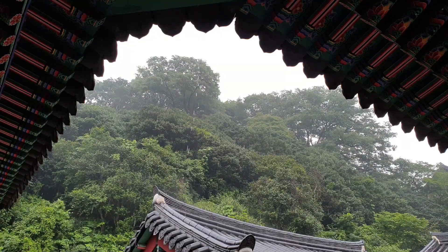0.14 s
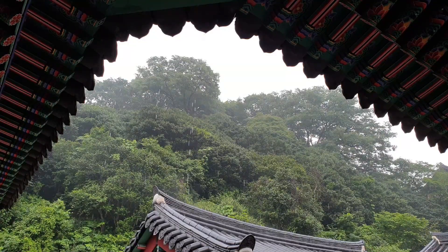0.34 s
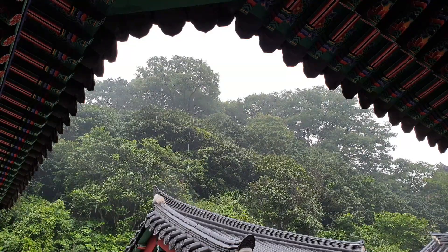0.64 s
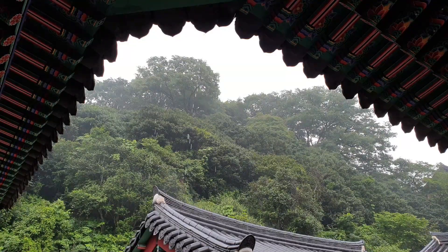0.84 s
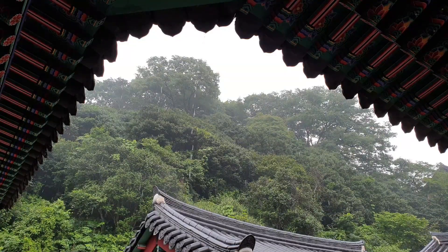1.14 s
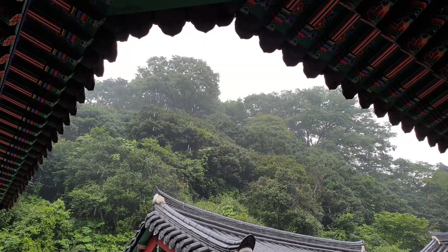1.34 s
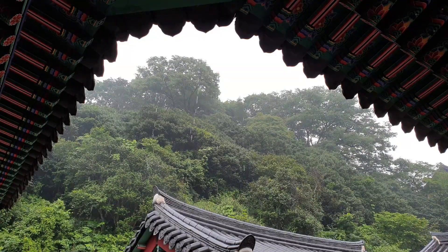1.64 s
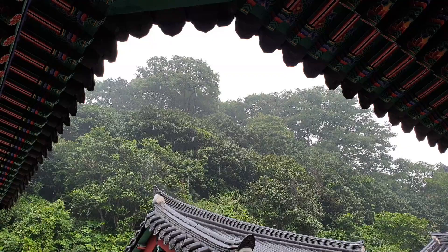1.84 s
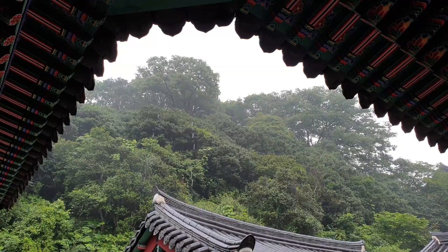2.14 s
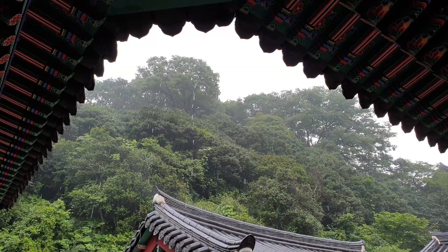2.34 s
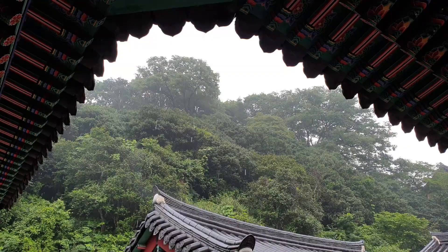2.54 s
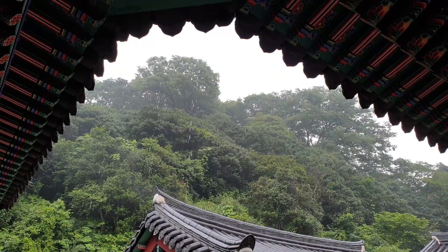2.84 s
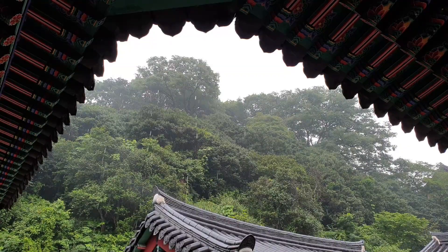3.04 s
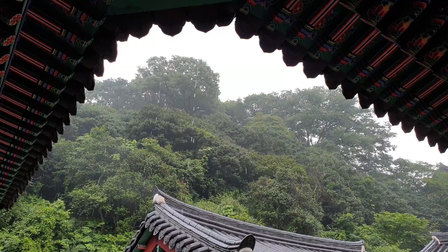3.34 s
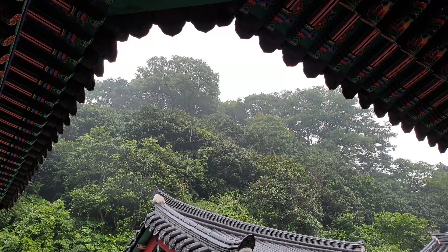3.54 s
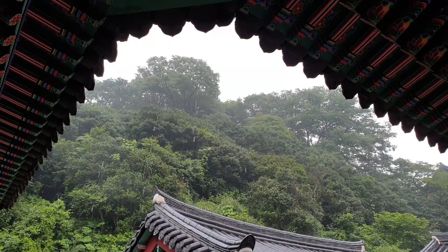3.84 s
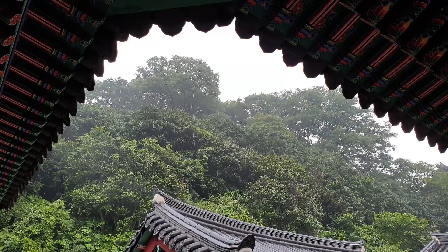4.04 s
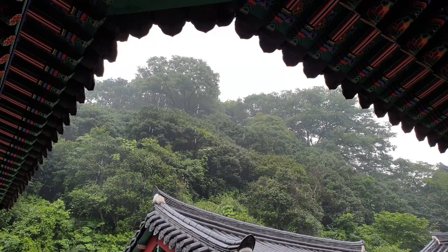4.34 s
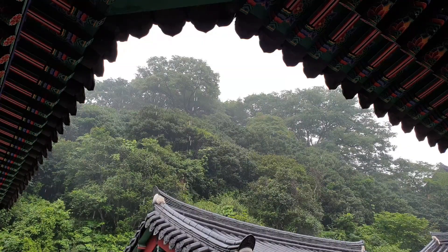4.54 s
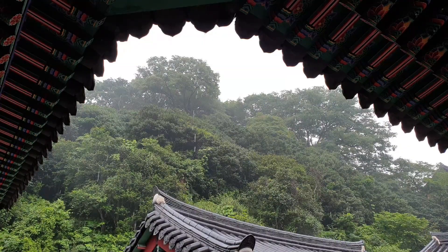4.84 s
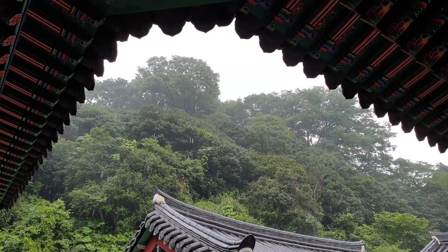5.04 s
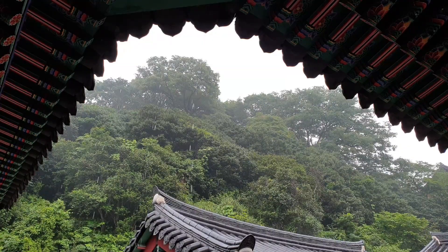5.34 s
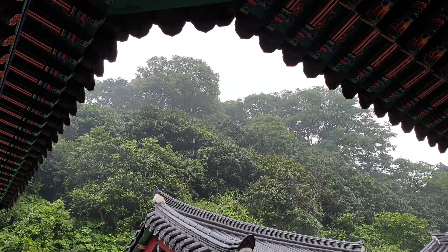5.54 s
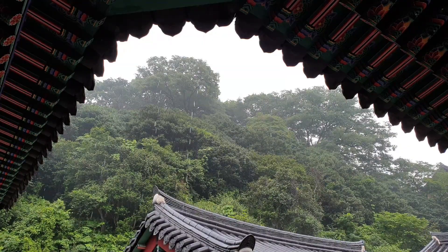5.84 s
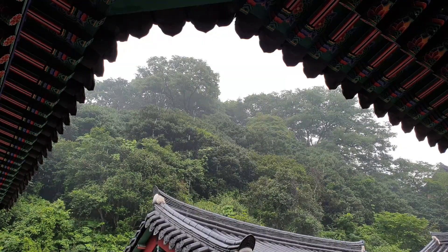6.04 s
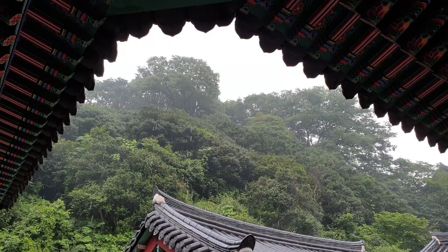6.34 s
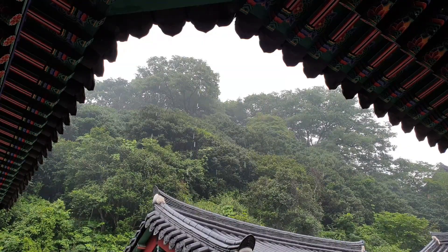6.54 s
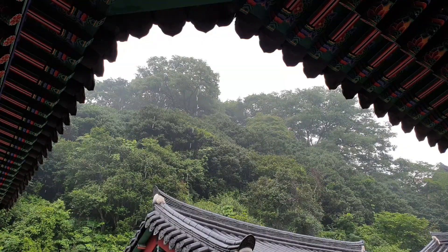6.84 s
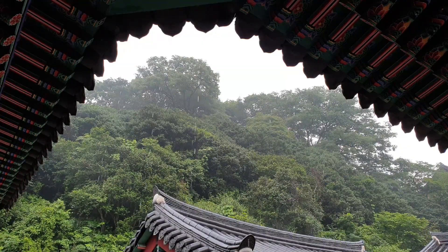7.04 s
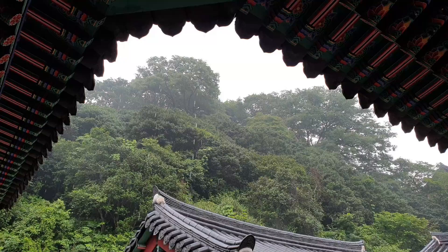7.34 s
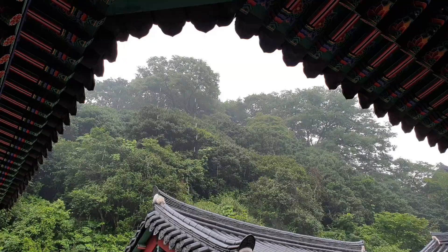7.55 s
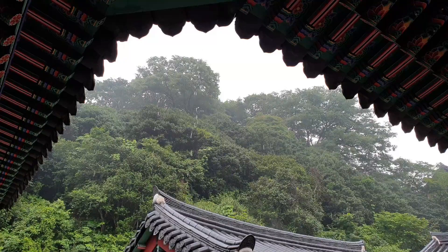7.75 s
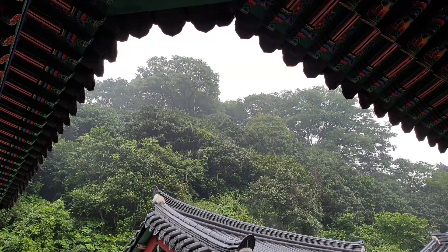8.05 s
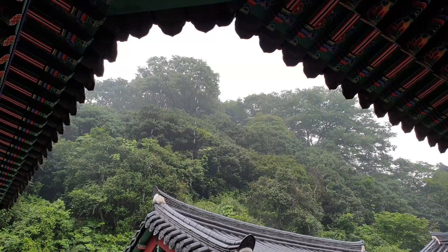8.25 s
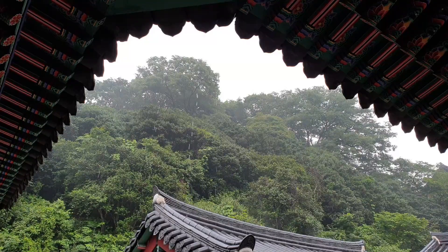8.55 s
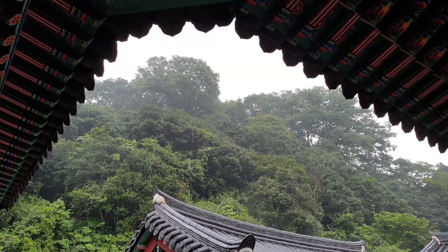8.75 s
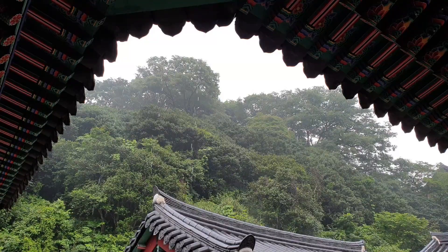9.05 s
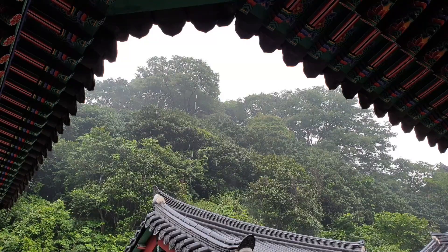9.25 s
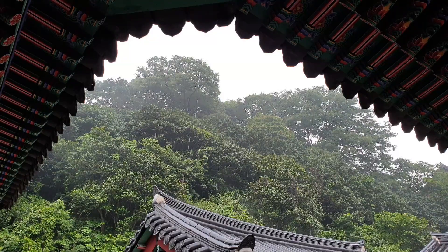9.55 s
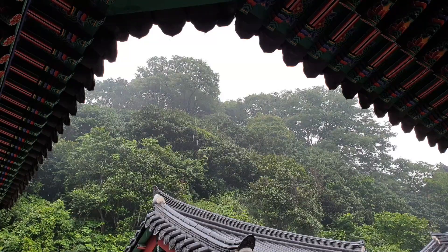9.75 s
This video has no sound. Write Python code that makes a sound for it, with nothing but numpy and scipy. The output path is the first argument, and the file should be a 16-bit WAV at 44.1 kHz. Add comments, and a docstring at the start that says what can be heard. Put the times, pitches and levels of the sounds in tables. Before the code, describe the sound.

Heard from beneath a tiled roof beside a wooded yard, close drips click unevenly on stone over a gentle wash of distant rain and a fine patter on leaves and roofs. A short, falling hinge squeak leads into the low knocks and shudders of a wooden door closing. Later a bird chirps softly four times in the trees. The dripping carries on throughout, with a faint rumble from the wooden floor.

```python
"""Drops tick sharply on wet stone under deep tiled eaves, each one echoing around the yard.
Behind them, rain on a forest: a smooth far wash and a grainy patter on nearby roofs and leaves.
In the hall a hinge slips and squeaks, and a wooden door judders shut, shaking panel and floor.
The timber floor also rumbles by itself, and midway a small bird gives four rising chirps."""
import sys
import numpy as np
from scipy import signal
from scipy.fft import rfft, irfft, next_fast_len
from scipy.io import wavfile
from scipy.ndimage import uniform_filter1d

SR = 44100
rng = np.random.default_rng(int(sys.argv[2]) if len(sys.argv) > 2 else 0)


def file_out(sig):
    """Save sig as 16-bit WAV at sys.argv[1]."""
    # one column per channel
    cols = np.atleast_2d(sig).T
    # limit, then scale
    lim = np.clip(cols, -1, 1)
    pcm = np.round(lim * 32767).astype(np.int16)
    wavfile.write(sys.argv[1], SR, pcm)


N = 437031
MS = SR / 1000  # samples per millisecond


def eave_drops():
    """Drops fall from the tiles and tick on wet stone; the near wall answers first, then the yard."""
    # Each row: start in seconds, level in dB, tick pitch in Hz, relative width, low slap in dB.
    clear_drops = [(.0163,-20,5860,0.75,-34),(.0356,-25,6600,0.2,-21),(.0708,-18.5,4140,0.47,0),(.2206,-23,7300,0.45,-15),
                   (.2473,-24,6600,0.27,-27),(.2875,-27.5,7700,.23,-27),(.3361,-22,6600,0.41,-14),(.375,-25,7550,0.72,-9),
                   (.422,-31,8500,0.69,-28),(.472,-27,9900,0.69,-25),(.5127,-21,8900,0.29,-30),(.6134,-27,9300,0.32,-29),(.6602,-28.5,7100,.95,-4),
                   (.7316,-23,8600,.63,-13),(.7898,-30,8800,0.35,-24),(.8721,-22.5,6960,0.71,-5),(.944,-28,6200,0.44,-10),(.9548,-31,6900,0.45,-22),(.9804,-27,8000,0.53,-22),(1.0582,-17.5,3700,0.59,-4),(1.1224,-20,8040,0.51,-28),
                   (1.176,-27.5,9700,0.32,-22),(1.2335,-22.5,5800,0.35,-15),(1.3143,-27.5,6600,0.48,-23),(1.436,-28,6350,0.27,-19),
                   (1.4727,-25.5,7100,0.53,-21),(1.512,-23,9600,.69,-34),(1.5794,-18,4240,0.57,-4.5),(1.6128,-21.5,6400,0.82,-23),
                   (1.6432,-22.5,11400,.35,-34),(1.6745,-19.5,7300,0.24,-26),(1.742,-25.5,7500,0.25,-7),(1.7701,-18,6660,1,-6),
                   (1.8814,-31,11600,0.22,-31),(1.9083,-25.5,6600,0.65,-17),(2.029,-28,9800,0.6,-24),(2.0943,-24,8800,0.79,-21),(2.1646,-20.5,5640,0.8,-9),(2.2217,-22.5,6500,0.32,-23),
                   (2.2988,-24,10600,0.49,-25),(2.3417,-15,4900,0.76,-5),(2.3906,-22,10200,0.8,-28),(2.509,-29,7200,0.46,-4),(2.6117,-24.5,10700,0.33,-33),
                   (2.7437,-16,6530,0.2,-23),(2.8003,-23.5,10900,0.31,-42),(2.9812,-28,6800,0.37,-26),(3.2438,-31,9400,.48,-21),
                   (3.2693,-27,10900,0.27,-33),(3.2809,-35,11600,.26,-39),(3.4272,-28.5,5240,0.73,-24),(3.483,-28,6230,0.35,-26),(3.5276,-26.5,10200,0.57,-23),
                   (3.6967,-28.5,9700,0.39,-30),(3.7576,-25.5,8500,0.35,-26),(3.8435,-17,4330,0.85,4),(3.9734,-31,8000,0.36,-5),(4.0144,-19.5,11200,0.57,-26),
                   (4.0368,-22,6300,0.52,-35),(4.095,-25,6560,0.28,-22),(4.2249,-28,11600,.24,-38),(4.2667,-21,9200,0.4,-27),
                   (4.3988,-26.5,9300,1,-17),(4.4988,-21,4900,0.63,8.5),(4.5977,-29,7300,0.67,-30),(4.6197,-29,9400,.57,-26),(4.627,-17.5,8200,0.39,-19),
                   (4.6948,-8,7950,0.19,-48),(4.801,-24.5,7050,0.83,-14),(4.8628,-29,6450,1,-7),(4.8858,-22.5,5900,0.62,-21),
                   (5.052,-29.5,7700,0.44,-15),(5.0619,-25,3900,.9,-26),(5.1074,-25.5,7200,0.4,-31),(5.1421,-20.5,4770,0.79,-19),(5.2623,-27,8850,0.49,-22),
                   (5.2729,-22.5,5440,0.41,-24),(5.2896,-29,7050,.43,-24),(5.3044,-25,9100,.68,-24),(5.497,-23,10500,0.47,-22),
                   (5.5432,-30.5,6000,0.28,-15),(5.6444,-24.5,6400,0.4,-14.5),(5.8295,-26,7950,0.46,-16),(5.9033,-26.5,7150,0.26,-25),
                   (6.0637,-26,10100,.62,-20),(6.0782,-15.5,5800,1,-9),(6.1013,-28,7700,0.51,-22),(6.138,-27,10300,0.31,-36),(6.1522,-13,6100,0.33,-13),
                   (6.248,-21,8900,.67,-11),(6.3235,-26.5,5960,0.4,-26),(6.3755,-20.5,5900,0.63,-25),(6.4592,-15.5,9500,0.48,-14),
                   (6.5103,-27,7200,0.2,-30),(6.5667,-25,7900,0.6,-18),(6.5826,-23.5,9700,0.66,-28),(6.6501,-27,8300,0.44,-32),
                   (6.6579,-20.5,5800,.69,-24),(6.6917,-25.5,10600,0.46,-31),(6.7988,-21,7840,.36,-13),(6.8595,-22.5,5370,0.48,-3),
                   (6.9379,-28,5300,0.46,-14),(6.9508,-17.5,4200,0.39,-8),(6.9935,-28.5,8900,0.3,-27),(7.0716,-25,7900,0.56,-22),(7.0848,-31,10500,.32,-30),(7.2156,-20,7950,0.3,-21),
                   (7.4553,-21.5,8700,0.26,-17),(7.6003,-27,7340,0.39,-13),(7.7073,-23,7300,.37,-9),(7.785,-31,9300,0.32,-14),(7.9552,-22.5,9600,.32,-16),
                   (8.0485,-27,7040,0.21,-18),(8.0804,-29.5,10600,0.23,-35),(8.165,-23,5500,0.42,2),(8.3112,-25,7160,0.45,-22),(8.3515,-24,9600,0.55,-20),
                   (8.6898,-24.5,7940,0.27,-27),(8.733,-15,5600,0.67,-21),(8.7702,-24,9900,.41,-28),(8.8625,-22.5,6170,0.63,-19),
                   (8.8914,-22,10900,.47,-33),(8.9459,-27,8100,0.9,-17),(9.237,-30.5,8600,.46,-6),(9.3882,-21,6600,0.28,-31),
                   (9.4072,-29,8400,0.31,-23),(9.4142,-24,7400,0.32,-22),(9.667,-35,9200,.53,-25),(9.6836,-15.5,7600,0.23,-20),(9.7155,-22.5,8900,0.27,-28),
                   (9.731,-25,9900,0.32,-29),(9.7572,-27,7300,0.34,-19),(9.78,-26.5,4330,.82,-2),(9.8431,-16,5100,0.57,-7)]
    starts, db, hz, width, slap_db = np.vstack([clear_drops, small_drops(count=90)]).T[:, :, None]
    t = np.arange(SR // 50) / SR
    impact = rng.standard_normal((len(starts), len(t))) * amp(-60 * t / .0015)
    impact += 1.8 * np.sign(impact) * (t == 0)  # the first contact is the sharpest

    def colour(f):
        ring = resonance(f, hz, 2.98 * width * hz) ** 2
        slap = amp(slap_db) * resonance(f, 2330, 2200) ** 2
        snap = amp(-13.5) * resonance(f, 10600, 34000)
        low_cut = (1j * f / (1300 + 1j * f)) ** 2  # too small a source for bass
        return low_cut * (ring + slap + snap)

    ticks = filtered(impact, colour)
    ticks *= np.sqrt(MS) / np.linalg.norm(ticks, axis=1, keepdims=True)
    # Nearer, louder drops are a little drier.
    yard_db = 2.5 - .2 * (db + 25) + rng.standard_normal(db.shape)
    near = near_wall(ticks)
    sounds = amp(yard_db)[:, None] * yard_echo(colour, len(starts))
    sounds[..., :len(t)] += near
    length = sounds.shape[-1]
    out = np.zeros((2, N + length))
    for start, sound in zip(starts[:, 0], amp(db)[:, None] * sounds):
        out[:, round(start * SR) - 6:][:, :length] += sound
    return out[:, :N]


def small_drops(count):
    """Quieter drops at random moments, as rows of start, level, pitch, width and slap."""
    first = np.array([.01, -34, 6500, .56, -34])
    last = np.array([N / SR - .01, -28.5, 12000, -.5, -25])
    return first + (last - first) * rng.random((count, 5))


def near_wall(ticks):
    """Each tick reaches both sides directly, then off wall and eaves within milliseconds."""
    # Each path: delay in seconds, gain in dB.
    left = [(0, -3), (.00085, -1), (.0017, -24), (.0019, -70), (.005, -21)]
    right = [(0, -1.1), (.001, -4.5), (.0019, -10), (.003, -12), (.0053, -13)]
    right_lag = .00005 + .00007 * rng.random((len(ticks), 1))  # each drop lands in its own spot

    def arrivals(f, paths, lag):
        return sum(amp(db) * np.exp(-2j * np.pi * f * (delay + lag)) for delay, db in paths)

    return np.stack([filtered(ticks, lambda f: arrivals(f, left, 0)),
                     filtered(ticks, lambda f: arrivals(f, right, right_lag))], axis=1)


def yard_echo(tick_colour, count):
    """The yard scatters each tick at once; facing roofs answer near 15 ms, then a clumpy tail dies."""
    # The tone of the yard. Each row: frequency in Hz, gain in dB.
    yard_tone = [(1000, -2.5), (3000, 7.5), (7000, 0.5), (11000, -2.5), (16000, -2.5)]
    t = np.arange(SR // 6) / SR
    late = np.clip(t - .009, 0, None)
    scatter = .75 * np.exp(-t / .015)
    onset = 1 - np.exp(-(late / .0054) ** 2)
    decay = 1.12 * np.exp(-late / .0034) + .5 * np.exp(-late / .055)
    clumps = amp(2.1 * drift((count, 1, len(t)), 50))
    tail = rng.standard_normal((count, 2, len(t))) * clumps * (scatter + onset * decay)
    tail = filtered(tail, lambda f: (amp(along(yard_tone, f)) * (.026 + abs(tick_colour(f))))[:, None])
    return tail / np.sqrt(np.sum(tail ** 2, (1, 2), keepdims=True) / MS)


def far_drops(count):
    """Countless tiny drops along the eaves: one-cycle ticks of random pitch, size and side."""
    when, pitch, smallness, side = rng.random((count, 4)).T[:, :, None]
    t = np.arange(48) / SR
    hz = 6000 * 2.6 ** pitch
    strength = amp(-30.5) * (smallness + .04) ** -.4
    ticks = strength * np.sin(2 * np.pi * hz * t) * np.exp(-t * hz * 2.8)
    at = (when * (N - 60)).astype(int) + np.arange(48)
    return np.array([np.bincount((at + lag).ravel(), (ticks * gain).ravel(), N)
                     for lag, gain in [(0, .25 + .33 * side), (3, 1 - .17 * side)]])


def rain():
    """A smooth wash from the far trees under a grainy patter on roofs and leaves nearby."""
    # Each row: time in seconds, wash level in dB, patter level in dB.
    levels = [(0, -53, -45), (3.2, -52.5, -48), (4.2, -52.5, -44), (7.5, -53, -46.5), (9.91, -53.5, -51.5)]
    # The dark wash and the bright patter. Each row: frequency in Hz, gain in dB.
    wash_tone = [(88, -19.5), (150, -7.5), (387, -0.5), (444, -0.5), (584, 0.5), (1370, -2), (2510, -3.5),
                 (3490, -4.5), (4000, -3), (5200, -10), (8800, -120)]
    patter_tone = [(700, -14), (1500, -17), (3000, -7), (5000, 1.5), (7200, 7), (9500, -4.5), (12000, 6),
                   (15900, -1.5), (16200, -50)]
    times, wash_db, patter_db = np.transpose(levels)
    t = np.arange(N) / SR
    wash = textured_noise(lambda f: amp(along(wash_tone, f)), patchy_db=2, grain_db=-1.64)
    patter = textured_noise(lambda f: amp(along(patter_tone, f)), patchy_db=.6, grain_db=2.5)
    return amp(np.interp(t, times, wash_db)) * wash + amp(np.interp(t, times, patter_db)) * patter


def hinge_squeak():
    """The hinge slips once a cycle as the door slows: a falling squeak with a weak octave."""
    # Spells of the squeak and of its octave. Each row: start in seconds, hold in seconds, level in dB.
    squeak_spells = [(1.692, 0.025, -42), (1.745, 0.098, -36.5), (1.888, .02, -48), (1.928, 0.061, -44.5),
                     (2.018, .022, -48), (2.07, .04, -61)]
    octave_spells = [(1.76, 0.26, -56.5)]
    start_s, base_hz, sag_hz_per_s = 1.692, 984.6, 260
    t = np.clip(np.arange(N) / SR - start_s, 0, 1)
    jerk_hz = 126.8 / (1 + (t / .062) ** 4)
    hz = base_hz - sag_hz_per_s * t + jerk_hz
    grip = drift(N, 400)  # uneven grip shakes pitch and level
    phase = 2 * np.pi * np.cumsum(hz + 6 * grip) / SR
    fundamental = swells(squeak_spells, attack_s=.019, fall_db_per_s=900) * np.sin(phase)
    octave = swells(octave_spells, attack_s=.02, fall_db_per_s=400) * np.sin(2 * phase)
    squeak = amp(3 * grip) * fundamental + amp(3.4 * grip) * octave
    return reverb(squeak, t60=.25, wet_db=-8) * amp([[-1.5], [2.5]])


def door_bumps(rumble):
    """The door knocks and judders into its frame, shaking its panel and the floorboards."""
    # Each row: start in seconds, judder in seconds, then panel, floor and knock levels in dB.
    bumps = [(2.341, 0.095, -30, -37.5, -48), (2.585, 0.033, -34, -53, -51), (2.745, .012, -57, -54, -58),
             (2.989, 0.019, -45, -68, -40), (3.225, 0.022, -47, -57, -62)]
    # The panel's low modes. Each row: frequency in Hz, relative level in dB.
    panel_modes = [(85, -7.5), (130, -1), (165, -6), (195, -12.5), (258, -16.5)]
    # The knock's resonances. Each row: frequency in Hz, width in Hz, gain in dB.
    knock_modes = [(306, 110, -5), (516, 200, -7), (668, 32, 0), (1780, 1300, -15)]

    def knock_tone(f):
        return abs(sum((-1) ** k * amp(db) * resonance(f, hz, width)
                       for k, (hz, width, db) in enumerate(knock_modes)))

    starts, judder_s, panel_db, floor_db, knock_db = np.transpose(bumps)
    panel = unit(sum(amp(db) * juddering_mode(hz, spread=.045) for hz, db in panel_modes))
    panel = panel * amp([[-.7], [.7]]) + amp(-8.5) * rumble
    boards = juddering_mode(hz=53.7, spread=.071)
    knock = textured_noise(knock_tone, patchy_db=2, grain_db=1)
    return (panel * swells(zip(starts, judder_s, panel_db), attack_s=.021, fall_db_per_s=124)
            + boards * swells(zip(starts, judder_s, floor_db), attack_s=.068, fall_db_per_s=83)
            + knock * swells(zip(starts, judder_s, knock_db), attack_s=.025, fall_db_per_s=141))


def juddering_mode(hz, spread):
    """A mode kept ringing by judder: its pitch wanders and its strength throbs."""
    wander, throb = uniform_filter1d(uniform_filter1d(rng.standard_normal((2, N)), 900), 900)
    cycles = np.cumsum(hz * (1 + spread * unit(wander))) / SR + rng.random()
    return unit(amp(3.2 * unit(throb)) * np.sin(2 * np.pi * cycles))


def joist_rumble():
    """The deep noise of the joists, shared by door and floor."""
    # Each row: frequency in Hz, gain in dB.
    joist_tone = [(12, -40), (20, -27), (43, 10), (59, 3.5), (124, 1.5), (152, -11), (220, -12),
                  (290, -3.5), (480, -120)]
    return textured_noise(lambda f: amp(along(joist_tone, f)), patchy_db=1, grain_db=-3)


def timber_floor(rumble):
    """The floor rumbles faintly throughout, with short swells."""
    # Each row: start in seconds, hold in seconds, level in dB.
    floor_swells = [(.24, 0.26, -54.5), (.57, 0.095, -53.5), (.96, 0.034, -60), (1.205, 0.081, -58.5),
                    (1.43, 0.027, -53), (1.59, .015, -63), (3.82, 0.052, -54), (4.3, .02, -65),
                    (4.79, .015, -64), (6.8, 0.094, -54), (6.97, .015, -62), (8.1, .012, -59)]
    return (amp(-68) + swells(floor_swells, attack_s=.012, fall_db_per_s=245)) * rumble


def bird():
    """Short, slightly hoarse rising whistles, smeared by the trees."""
    # Each row: start in seconds, level in dB, opening pitch in Hz, closing pitch in Hz.
    chirps = [(4.875, -44.5, 4400, 4800), (5.575, -41, 3900, 5060), (5.88, -45.5, 4200, 5100),
              (6.16, -44, 4200, 5040)]
    out, t = np.zeros(N), np.arange(SR // 8) / SR
    for start, db, from_hz, to_hz in chirps:
        hz = to_hz - (to_hz - from_hz) * np.exp(-t / .018) + 50 * drift(len(t), 150)
        envelope = (1 - np.exp(-t / .003)) * np.clip((.055 - t) / .0045, 0, 1)
        level = amp(db + 2.4 * drift(len(t), 120))
        out[round(start * SR):][:len(t)] += level * envelope * np.sin(2 * np.pi * np.cumsum(hz) / SR)
    return reverb(out, t60=.4, wet_db=7)


def textured_noise(colour, patchy_db, grain_db):
    """Stereo noise of rms 1 with patches of random gain and millisecond grains."""
    # Stereo image. Each row: frequency in Hz, left-right correlation.
    likeness = [(30, 0.25), (150, 0.91), (300, 0.83), (600, 0.42), (1200, 0.037), (16000, 0.018)]

    def mid_side(f):
        angle = np.arccos(np.clip(along(likeness, f), -1, 1)) / 2
        return colour(f) * [np.cos(angle), np.sin(angle)]

    spectra = signal.stft(rng.standard_normal((2, N)), nperseg=512)[2]
    patches = uniform_filter1d(rng.standard_normal(spectra.shape[1:]), 6, axis=0)
    patches = unit(uniform_filter1d(patches, 10, axis=1))
    pair = signal.istft(spectra * amp(patchy_db * patches), nperseg=512)[1][:, :N]
    mid, side = filtered(pair * amp(grain_db * drift(N, 60)), mid_side)
    return unit(np.array([mid + side, mid - side]))


def reverb(x, t60, wet_db):
    """Adds a dying noise tail, different on each side."""
    t = np.arange(int(t60 * SR)) / SR
    tail = rng.standard_normal((2, len(t))) * amp(-60 * t / t60)
    return x + amp(wet_db) * signal.fftconvolve(x[None], tail / np.linalg.norm(tail[0]), axes=1)[:, :N]


def swells(rows, attack_s, fall_db_per_s):
    """Gain that rises, holds and dies away for each row."""
    t = np.arange(0, N / SR, .001)
    gain = np.zeros(len(t))
    for start, hold_s, db in rows:
        rise = np.clip((t - start) / attack_s, 0, 1) ** 2
        falling_s = np.clip(t - start - attack_s - hold_s, 0, None)
        gain += rise * amp(db - fall_db_per_s * falling_s)
    return np.interp(np.arange(N) / SR, t, gain)


def filtered(x, response):
    """Applies a complex frequency response along the last axis."""
    n = x.shape[-1]
    padded = next_fast_len(n + 2048)
    return irfft(rfft(x, padded) * response(np.fft.rfftfreq(padded, 1 / SR)), padded)[..., :n]


def resonance(f, hz, width_hz):
    return 1j * f * width_hz / (hz * hz - f * f + 1j * f * width_hz)


def along(points, hz):
    """Reads a curve on a log frequency axis."""
    freqs, values = np.transpose(points)
    return np.interp(np.log(hz + 1), np.log(freqs + 1), values)


def drift(shape, samples):
    """Noise of rms 1, smoothed over so many samples."""
    return unit(uniform_filter1d(rng.standard_normal(shape), samples))


def unit(x):
    return x / np.sqrt(np.mean(x ** 2) + 1e-20)


def amp(db):
    return 10 ** (np.asarray(db) / 20)


def scene():
    """Rain and drops outside, door and floor in the hall, a bird in the trees."""
    water = rain() + eave_drops() + far_drops(count=1000)
    squeak = hinge_squeak()
    rumble = joist_rumble()
    return water + squeak + door_bumps(rumble) + timber_floor(rumble) + bird()


def record(dry):
    """The loudest ticks are softly rounded off; the left is brighter and the very top is cut."""
    ceiling, top_hz = .62, 16900
    soft = dry / (1 + np.abs(dry / ceiling) ** 3) ** (1 / 3)
    tilted = filtered(soft, lambda f: amp([[.9], [-.9]] * np.clip((f - 10000) / 3000, 0, 1)))
    return filtered(tilted, lambda f: amp(-np.clip(f - 15900, 0, None) / 60) * (f < top_hz))


dry = scene()
out = record(dry)
file_out(out)
```